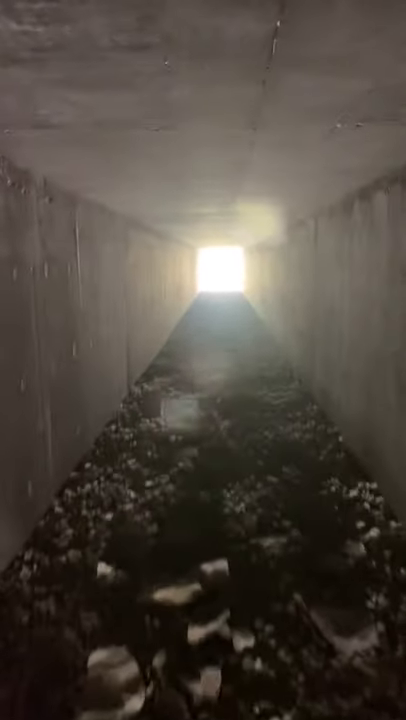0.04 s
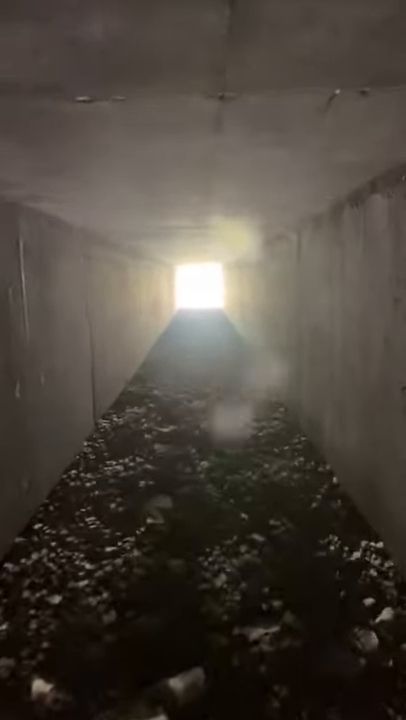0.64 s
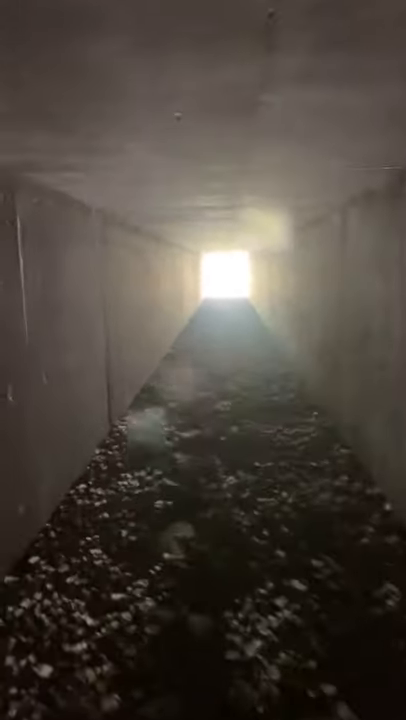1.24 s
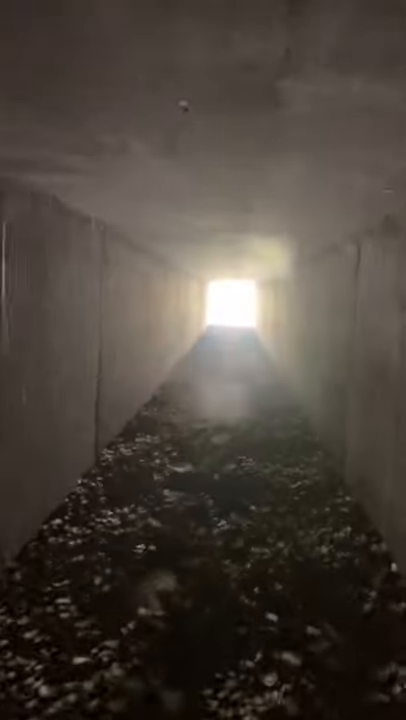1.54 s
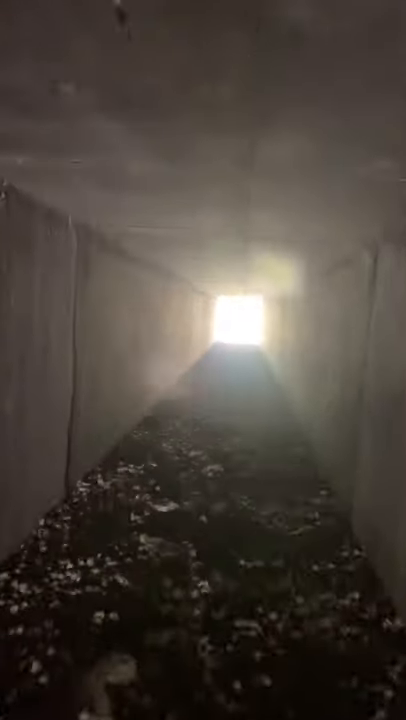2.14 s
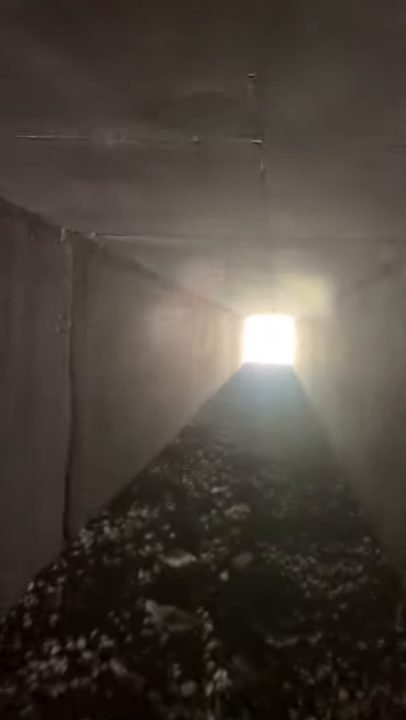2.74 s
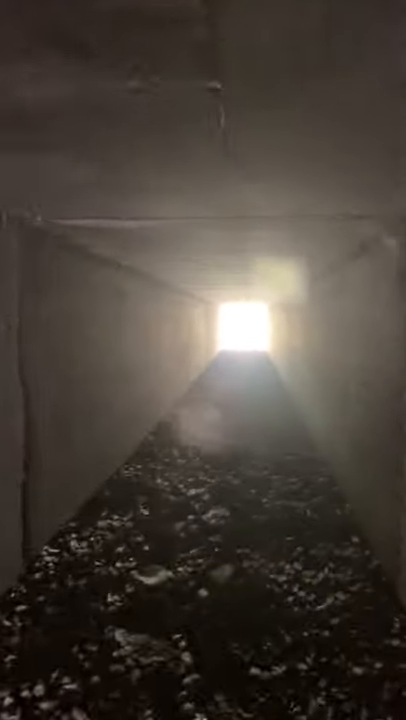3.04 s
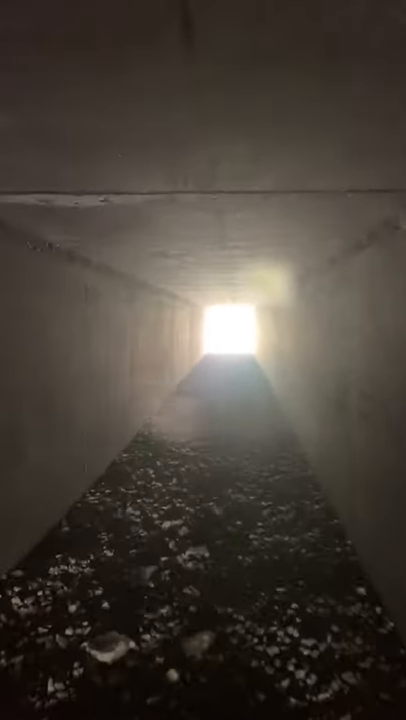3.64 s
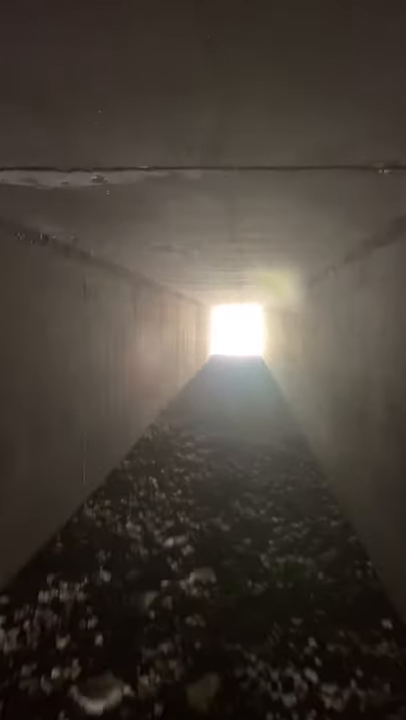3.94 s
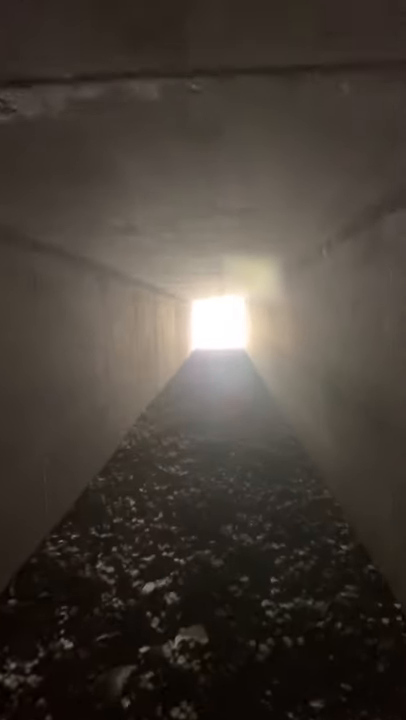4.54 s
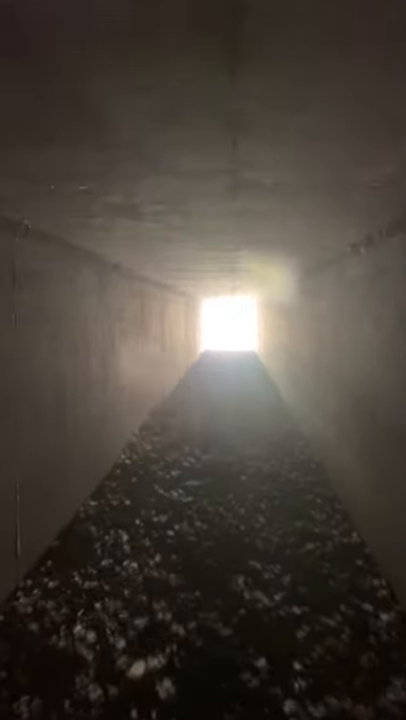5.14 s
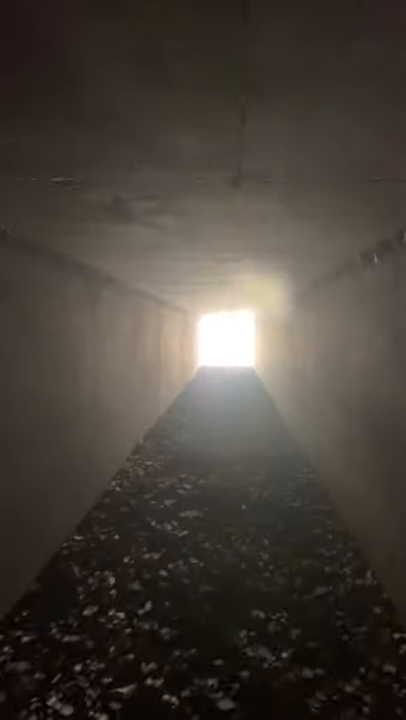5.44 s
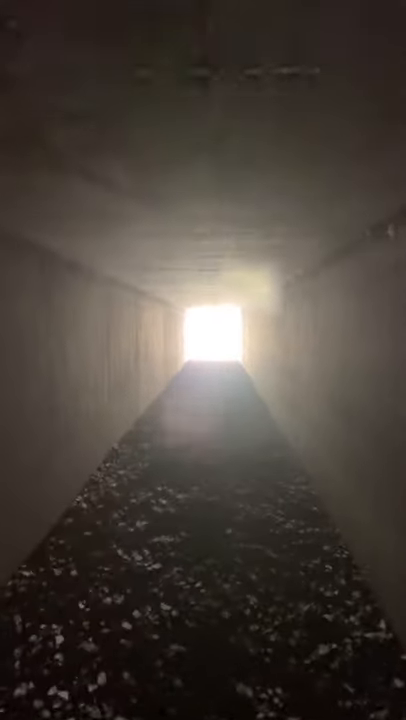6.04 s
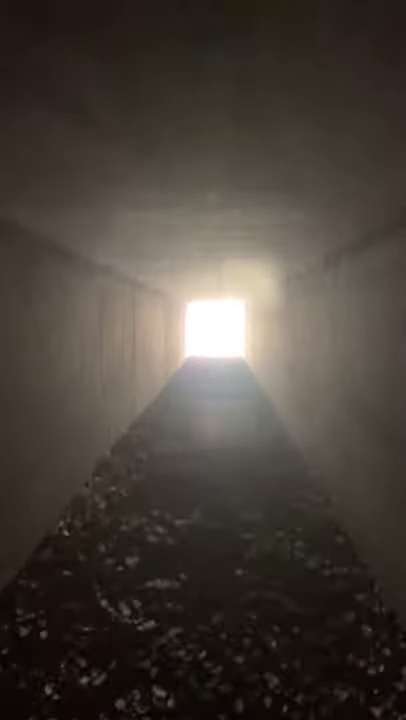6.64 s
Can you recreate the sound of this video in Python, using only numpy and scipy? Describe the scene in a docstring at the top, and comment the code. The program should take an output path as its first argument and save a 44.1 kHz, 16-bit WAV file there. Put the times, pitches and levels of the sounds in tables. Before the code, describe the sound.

Steady footsteps crunch through loose stones from start to finish, about three every two seconds, with scattered clacks and dull thuds as the gravel gives way. A narrow concrete tunnel makes them ring hollow and carries a deep rumble of faraway traffic that pulses with the walking. The sound is close, heard from a phone in the walker's hand, with light, low handling bumps.

```python
"""A narrow concrete tunnel, where someone walks on loose gravel holding a phone.
Heel and sole shove stones together, and each contact rings as a damped oscillator: together they crunch.
The walls return reverberation and hum with standing waves at their cross resonances.
Distant traffic rumbles down the tunnel, and each footfall swells its deep boom.
The moving hand bumps and knocks the phone, reaching the microphones as structure-borne sound."""
import sys
import numpy as np
from scipy import signal
from scipy.fft import rfft, irfft, next_fast_len
from scipy.io import wavfile
from scipy.ndimage import uniform_filter1d

SR = 44100
rng = np.random.default_rng(int(sys.argv[2]) if len(sys.argv) > 2 else 0)


def int16_out(signal):
    """Quantize to a 16-bit WAV file."""
    q = np.round(np.clip(np.atleast_2d(signal).T, -1, 1) * 32767)
    wavfile.write(sys.argv[1], SR, q.astype(np.int16))


N = 300321

# footfalls: heel lands t/s, heel settling time/s, heel level/dB, roll time/s, roll level/dB, boom level/dB
STEPS = [(0.094, .014, -36, 0.045, -47.5, -35), (0.653, 0.0053, -38, 0.2, -55.5, -27),
         (1.382, 0.038, -32.5, 0.15, -42, -30), (1.995, .014, -25, 0.093, -43, -26.5),
         (2.626, 0.028, -52, 0.073, -41.5, -28), (3.256, 0.0064, -36, 0.17, -45.5, -28.5),
         (3.956, .012, -34, 0.095, -50, -47), (4.556, .009, -42.5, 0.064, -36.5, -31),
         (5.187, 0.018, -31.5, 0.018, -38.5, -51), (5.785, .022, -36.5, 0.035, -43.5, -33),
         (6.426, .018, -32, 0.0098, -45.5, -31)]
# spectral colour of the stones at the phone: f/Hz, gain/dB
STONE_COLOUR = [(60, -37), (150, 2.5), (220, -1.5), (320, 1.5), (470, -1.5), (750, 1.5), (950, 0),
                (1400, -1.5), (2000, -5), (2600, 2), (3200, -3.5), (4200, -4), (5500, 0.9), (6400, -2.5),
                (7400, -12.5), (8400, -21.5), (12000, -21.5), (15000, -43)]


def gravel(bed_db=1, grit_db=-7.5):
    """Impact excitation: each contact of a shove knocks the packed bed, clacks a stone and cracks grit."""
    # stones giving way or kicked aside: t/s, settling time/s, level/dB, sharpness/dB
    slips = [(.002, 0.016, -46, 2.5), (.169, .008, -42, 8), (.194, 0.018, -43.5, 7),
             (0.274, 0.0054, -61, 14), (0.359, 0.017, -40, -1.5), (0.716, 0.0091, -36.5, -2.5),
             (0.748, 0.011, -42.5, 4), (0.941, .014, -52.5, -0.5), (1.114, .012, -29.5, 2),
             (1.136, 0.013, -29, -0.5), (1.158, .016, -27.5, 4), (1.196, 0.0059, -36.5, 0),
             (1.252, .026, -30, 1.5), (1.299, 0.0073, -48, 3), (1.413, 0.023, -43, -10),
             (1.525, 0.02, -47, 15.5), (1.594, .005, -30, -2.5), (1.714, 0.015, -33, -2.5),
             (2.003, .012, -28.5, 5), (2.125, .014, -38, 2), (2.25, 0.011, -44, 5),
             (2.291, 0.0085, -50.5, 4), (2.383, 0.021, -46.5, 1.5), (2.668, .022, -34.5, -3),
             (2.684, 0.011, -39.5, 9), (3.08, .016, -43, -3), (3.123, 0.016, -38.5, -4.5),
             (3.284, 0.012, -31.5, 2.5), (3.325, .022, -32, 3.5), (3.416, .007, -44, 12.5),
             (3.538, 0.019, -42.5, 6.5), (3.6, 0.027, -52, -6.5), (3.678, .016, -42.5, -1.5),
             (3.72, .018, -45, 2.5), (3.849, 0.044, -46, -4.5), (3.928, .012, -40, 0),
             (3.99, .016, -39, 0.5), (4.139, 0.017, -52.5, 7), (4.176, 0.014, -36, 1.5),
             (4.2, 0.0071, -35, -3.5), (4.397, 0.0054, -50.5, 4.5), (4.582, 0.018, -39.5, 2),
             (4.649, 0.007, -42, 2), (4.826, 0.0072, -52.5, 10.5), (4.853, 0.0047, -50, 4.5),
             (5.004, 0.014, -51.5, 6), (5.038, .025, -42, -0.5), (5.06, .022, -33.5, 0.5),
             (5.11, 0.04, -41.5, 1), (5.385, .012, -66, 10), (5.484, .014, -39.5, 1), (5.6, .04, -43, -3.5),
             (5.677, .01, -45, -2), (5.727, 0.028, -52, -1.5), (5.811, .012, -36.5, 0.5),
             (5.91, 0.03, -37.5, 6.5), (6.049, .02, -35.5, 5), (6.095, 0.0052, -41.5, 3.5),
             (6.135, 0.016, -47.5, 0), (6.2, 0.032, -44.5, -1), (6.265, 0.024, -43, 9.5),
             (6.35, 0.024, -44.5, 4.5), (6.398, 0.031, -38.5, -3.5), (6.452, 0.0082, -32, 5),
             (6.582, 0.031, -32.5, 3), (6.614, 0.026, -28.5, 4), (6.656, 0.01, -38, 4)]
    shoves = [shove for *step, _ in STEPS for shove in footfall(*step)] + slips
    track = np.zeros((2, N))
    for s, settle_s, db, sharp_db in shoves:
        delays, sizes = avalanche(settle_s)
        start = s + delays.min()
        smallness = np.exp(0.06 * rng.standard_normal())  # small stones sound higher
        bed = contacts(delays, sizes, pitch_hz=520 * smallness, scatter=0.45, cycles=1.73)
        stone = contacts(delays, sizes, pitch_hz=1330 * smallness, scatter=0.4, cycles=1.24)
        grit = contacts(delays, sizes, pitch_hz=4490, scatter=0.25, cycles=3.6)
        add(track, start, amp(db + bed_db - 0.85 * sharp_db) * bed)  # a sharp shove: less bed, more grit
        add(track, start, amp(db) * placed(stone))
        add(track, start, amp(db + grit_db + sharp_db) * placed(grit))
    return coloured(track, STONE_COLOUR)


def footfall(s, settle_s, heel_db, roll_s, roll_db, count=17, shifts_per_s=42):
    """Loading and unloading: the heel strikes, and small shifts of stones follow the load on the sole."""
    rise_db_per_s, release_db_per_s = 651.5, 150
    brush_s, shift_settle_s = 0.03, 0.015  # the shoe brushes the top stones before the heel lands
    heel_sharp_db = -1.5  # the heel drives deep into the bed
    age = (np.arange(count) + rng.random(count)) / shifts_per_s - brush_s
    load_db = roll_db - rise_db_per_s * np.maximum(-age, 0)
    load_db -= release_db_per_s * np.maximum(age - roll_s, 0)
    sharp_db = rng.normal(-0.5, 3, count)
    shifts = [(s + t, shift_settle_s, db, sharp) for t, db, sharp in zip(age, load_db, sharp_db)]
    return [(s, settle_s, heel_db, heel_sharp_db)] + shifts


def avalanche(settle_s, count=20, touch_count=6, spread_db=6.5, fade_db=2, touch_db=-15):
    """Granular relaxation: light touches, the hardest slip, then contacts at an exponentially falling rate."""
    age = -np.log(1 - (np.arange(count) + rng.random(count)) / (count + 1))  # in settling times
    sizes = amp(spread_db * np.clip(rng.standard_normal(count), -2, 1.6) - fade_db * age)
    sizes[1] = sizes.max()
    ahead = (np.arange(touch_count) + rng.random(touch_count)) / touch_count
    touches = sizes.max() * amp(touch_db * ahead)
    delays = settle_s * np.r_[-0.62 * ahead, age]
    return delays, np.r_[touches, sizes]


def contacts(delays, sizes, pitch_hz, scatter, cycles, size=360):
    """Superposition of damped sinusoids, one a contact, scaled to the energy of 10 ms at rms 1."""
    hz = pitch_hz * np.exp(scatter * rng.triangular(-2, 0, 2, (len(delays), 1)))
    turns = hz * np.arange(size) / SR
    push = sizes * rng.choice([-1, 1], len(sizes))
    onset = 1 - np.exp(-turns / 0.33)  # each contact swells in softly over about a third of a cycle
    grains = push[:, None] * np.sin(2 * np.pi * turns) * np.exp(-turns / cycles) * onset
    where = ((delays - delays.min()) * SR).astype(int)[:, None] + np.arange(size)
    cluster = np.bincount(where.ravel(), grains.ravel())
    return cluster * np.sqrt(SR / 100) / np.linalg.norm(cluster)


def clacks(count=4, longest_gap_s=0.0035, loss_db=6.5, graze_s=0.004, graze_db=-13.5):
    """Inelastic rebound: a large stone grazes its neighbour, then chatters, ringing in two modes."""
    # collisions of large stones: t/s, level/dB, f/Hz
    collisions = [(0.653, -45, 1860), (0.714, -42, 3300), (0.828, -45.5, 1510), (1.11, -33, 1680),
                  (1.133, -33.5, 3800), (1.16, -27, 1080), (1.163, -41, 4860), (1.194, -33, 3160),
                  (1.307, -39.5, 2440), (1.593, -27.5, 874), (1.594, -24, 1375), (1.598, -33, 1910),
                  (1.715, -42.5, 2000), (2.292, -44, 4200), (2.935, -56, 1870), (3.256, -41.5, 1560),
                  (3.284, -33, 4840), (3.329, -34, 2050), (3.412, -37.5, 5650), (3.678, -47, 2460),
                  (4.18, -49.5, 3950), (4.2, -41.5, 1500), (4.202, -41, 3400), (4.399, -56, 4600),
                  (4.555, -38, 1960), (4.652, -33, 1170), (5.058, -36, 2600), (5.186, -42, 3670),
                  (5.194, -38, 1250), (5.81, -47, 1800), (6.439, -37.5, 3670), (6.616, -28.5, 1370),
                  (6.618, -38.5, 4960), (6.628, -39.5, 2360), (6.665, -35, 1130), (6.74, -46, 5500)]
    track = np.zeros((2, N))
    for s, db, hz in collisions:
        bounces = np.cumsum(longest_gap_s * (1 + rng.random(count)) / 2)
        delays = np.r_[-graze_s, bounces - bounces[0]]
        sizes = amp(np.r_[graze_db, -loss_db * np.arange(count)])
        note = contacts(delays, sizes, pitch_hz=hz, scatter=0.097, cycles=1.8, size=800)
        overtone = contacts(delays, sizes, pitch_hz=hz * 1.604, scatter=0.15, cycles=1.6, size=800)
        add(track, s - graze_s, amp(db) * placed(note + amp(-8) * overtone))
    return coloured(track, STONE_COLOUR)


def thuds(settle_s=0.016, count=10):
    """Damped resonance: deep stones shift under the walker's weight and the bed gives a hollow note."""
    # shifts of the packed bed: t/s, level/dB, f/Hz
    deep_shifts = [(0.101, -35, 302.5), (1.147, -32, 342), (1.186, -42, 530), (1.395, -33.5, 450),
                   (1.996, -26, 445), (2.678, -29, 455), (2.7, -35, 264), (3.29, -32, 407),
                   (3.315, -42.5, 616), (3.953, -29.5, 562), (4.195, -31, 551), (4.568, -39, 410),
                   (5.069, -35, 517), (5.195, -35, 438), (5.801, -38.5, 430), (6.445, -31.5, 500),
                   (6.615, -33, 730), (6.664, -35.5, 534)]
    track = np.zeros((2, N))
    for s, db, hz in deep_shifts:
        age = 2 * (np.arange(count) + rng.random(count)) / count  # in settling times
        note = contacts(settle_s * age, np.exp(-age / 2), pitch_hz=hz, scatter=0.16, cycles=2.5, size=1600)
        add(track, s, amp(db) * placed(note))
    return coloured(track, STONE_COLOUR)


def snaps(length_s=0.015, count=30):
    """Brittle fracture: a breaking stone sheds a quick spray of tiny, bright chips."""
    # stones snapping underfoot: t/s, level/dB
    fractures = [(0.19, -63), (1.111, -55), (1.195, -64), (1.598, -63), (1.999, -43.5), (2.684, -65.5),
                 (3.28, -65.5), (3.415, -70), (3.537, -65.5), (4.18, -67), (4.59, -67), (5.191, -65),
                 (5.918, -59), (6.06, -67), (6.134, -64.5), (6.453, -55), (6.614, -51.5)]
    track = np.zeros(N)
    for s, db in fractures:
        delays = length_s * rng.random(count)
        sizes = rng.exponential(size=count)
        add(track, s, amp(db) * contacts(delays, sizes, pitch_hz=7500, scatter=0.18, cycles=1.4))
    return track


def reverberation(x, stretches=28):
    """Convolution with the tunnel's response, whose echo pattern changes as the walker moves on."""
    wet = np.zeros((2, N))
    for part in np.array_split(np.arange(N), stretches):
        add(wet, part[0] / SR, signal.fftconvolve(x[part][None], impulse_response(), axes=1))
    return diffuse(wet)


def impulse_response(early_db=-3, tail_db=-7.5, early_t60_s=0.097, first_wall_s=0.002):
    """Multiple reflection: a flurry from the near walls and a tail whose decay depends on frequency."""
    # reverberation time of the tunnel: f/Hz, T60/s
    decay_times = [(150, 0.97), (500, 0.58), (1100, 0.38), (1700, 0.55), (3100, 0.55), (4100, 0.87),
                   (5200, 0.53), (7000, 0.47), (10000, 0.37)]
    hz, frame_s, spectra = signal.stft(rng.standard_normal((2, SR)), SR, nperseg=256)
    decay = amp(-60 * frame_s / along(decay_times, hz)[:, None])
    tail = signal.istft(spectra * decay, SR, nperseg=256)[1][:, :SR]
    t = np.arange(SR) / SR
    early = rng.standard_normal((2, SR)) ** 3 * amp(-60 * t / early_t60_s)  # cubed noise is spiky
    response = (amp(early_db) * unit(early) + amp(tail_db) * unit(tail)) / np.sqrt(SR)
    return np.pad(response, ((0, 0), (round(first_wall_s * SR), 0)))


def standing_waves(x):
    """Normal modes: sound between parallel walls hums on at a few pitches, more in some places."""
    # cross resonances: f/Hz, relative level/dB, T60/s
    modes = [(165.3, -10, 0.12), (247.5, 0, 0.67), (332, -2.5, 0.23), (407, -8.5, 0.54),
             (506.3, -5.5, 0.18), (578, -6, 0.28), (654, -8.5, .45)]
    # coupling to the modes along the walk: t/s, gain/dB
    coupling = [(0, 4), (1.17, 8), (1.7, 0.5), (2.02, 6.5), (3.3, 6), (4.2, 8), (5.8, 4), (6.7, 4)]

    def response(f):
        total = 0
        for hz, db, t60 in modes:
            width_hz = np.log(1000) / (np.pi * t60)
            total = total + amp(db) * 1j * f * width_hz / (hz * hz - f * f + 1j * f * width_hz)
        return total
    return filtered(x * gain_curve(coupling), response)


def booms(delay_s=0.17, width_s=0.1):
    """Amplitude modulation: the deep resonance swells as the walker's weight arrives after each heel."""
    t = np.arange(N) / SR
    swells = sum(amp(db) * np.exp(-((t - s - delay_s) / width_s) ** 2 / 2) for s, *_, db in STEPS)
    return rumble() * swells


def bumps(gain_db=3.06, width_cycles=0.4, sag_s=0.046, tremble_s=0.24, count=2):
    """Structure-borne pulses: each jolt of the hand is a low push and pull, sagging as the grip gives."""
    # hard jolts on the phone: t/s, relative level/dB, f/Hz
    jolts = [(0.17, -28.5, 116), (0.259, -23.5, 82), (0.605, -25, 72), (0.892, -18, 92),
             (1.486, -19.5, 74.5), (1.56, -19.5, 89), (1.695, -25.5, 90.5), (2.097, -13.5, 79),
             (2.173, -32, 104), (2.212, -27.5, 120), (2.406, -34, 139), (2.599, -22, 147),
             (2.649, -21, 118), (2.74, -26, 93), (2.772, -29, 134), (2.851, -26, 88), (3.174, -32, 101),
             (3.423, -21.5, 75), (3.459, -33, 110), (3.957, -26, 100.5), (4.618, -24.5, 100),
             (4.732, -28, 72.5), (6.184, -30.5, 85), (6.678, -26.5, 124)]
    # light jolts after each footfall, same columns
    trembles = [(s + tremble_s * (k + rng.random()) / count,
                 rng.normal(-31.5, 1.5),
                 96 * np.exp(rng.normal(0, 0.17)))
                for s, *_ in STEPS for k in range(count)]
    track = np.zeros(N)
    t = np.arange(-SR // 30, SR // 30) / SR
    for s, db, hz in jolts + trembles:
        turns = hz * sag_s * (1 - np.exp(-t / sag_s))
        window = np.exp(-(hz * t / width_cycles) ** 2 / 2)
        add(track, s + t[0], -amp(db + gain_db) * np.sin(2 * np.pi * turns) * window)
    return track


def knocks(gain_db=-1, thud_hz=260, rub_log_width=0.42):
    """Impact and friction: a fingertip on the case makes a rough blip whose pitch drops into a thud."""
    # taps on the case: t/s, relative level/dB, starting f/Hz, rise time/s, roughness (0-1)
    taps = [(0.869, -36.5, 780, 0.0046, 0.3), (0.874, -27, 283, 0.0026, 0.23),
            (1.024, -42.5, 564, 0.0053, 0.23), (2.078, -31, 900, 0.0024, 0.16),
            (2.201, -38, 1410, 0.00077, 0.2), (2.585, -34.5, 2280, 0.0015, 0.13),
            (2.59, -32, 420, 0.0014, .1), (3.584, -44, 880, 0.0014, 0.16),
            (4.742, -37.5, 660, 0.0021, 0.06), (6.673, -34, 400, 0.0011, 0.56)]
    track = np.zeros(N)
    t = np.arange(SR // 20) / SR
    f = np.fft.rfftfreq(len(t), 1 / SR)
    for s, db, hz, rise_s, rough in taps:
        fall_s = 2 * rise_s
        turns = thud_hz * t + (hz - thud_hz) * fall_s * (1 - np.exp(-t / fall_s))
        band = 1 / (1 + (np.log((f + 1) / hz) / rub_log_width) ** 2) ** 2
        rub = unit(irfft(band * rfft(rng.standard_normal(len(t))), len(t)))
        blip = (1 - rough) * np.sin(2 * np.pi * turns) + rough * rub
        envelope = t / rise_s * np.exp(1 - t / rise_s)
        add(track, s, amp(db + gain_db) * blip * envelope)
    return track


def traffic(gain_db=0.74, wash_db=-57):
    """Duct propagation: a deep rumble and a faint steady wash come in through the tunnel mouths."""
    # rumble of a vehicle drawing nearer: t/s, relative level/dB
    approach = [(0, -39), (2.502, -36.5), (3.897, -37.5), (4.799, -35), (6.81, -37.5)]
    # spectrum of the wash: f/Hz, relative density/dB
    wash_spectrum = [(40, -18.5), (130, -18), (250, -6.5), (400, -8.5), (750, -5), (1100, -10), (1400, -12),
                     (1750, -19), (2300, -21), (2900, -30), (3600, -34.5), (4100, -22), (4500, -26.5),
                     (5400, -27), (7200, -47.5), (14000, -50)]
    return amp(gain_db) * gain_curve(approach) * rumble() + amp(wash_db) * diffuse_noise(wash_spectrum)


def rumble():
    """Resonance driven by noise: the tunnel's deep note, held at an even level."""
    # spectrum of the resonance: f/Hz, relative density/dB
    spectrum = [(20, -39.5), (32, -19.5), (42, -8.5), (54, 6), (66, -10), (90, -12.5), (130, -23.5),
                (200, -29.5), (400, -44), (900, -91)]
    noise = diffuse_noise(spectrum)
    power = uniform_filter1d(np.mean(noise ** 2, axis=0), size=SR // 8)
    return noise / np.sqrt(np.abs(power))


def diffuse_noise(spectrum):
    """Spectral shaping: white noise becomes a coloured diffuse field of rms 1."""
    noise = filtered(rng.standard_normal((2, N)), lambda hz: amp(along(spectrum, hz)))
    return unit(diffuse(noise))


def diffuse(pair):
    """Spatial coherence: two unrelated signals mix into a diffuse field at two close microphones."""
    # likeness of left and right: f/Hz, correlation (-1 to 1)
    coherence = [(100, 1), (220, 0.44), (320, 0.89), (900, 0.93), (1500, 0.89), (2200, -0.21), (4600, 0.41),
                 (5500, 0.24), (7000, 0.6)]

    def weights(hz):
        angle = np.arccos(np.clip(along(coherence, hz), -1, 1)) / 2
        return np.array([np.cos(angle), np.sin(angle)])
    common, apart = filtered(pair, weights)
    return np.array([common + apart, common - apart])


def placed(sound, spread_s=4e-5, spread_db=2):
    """Path difference: a stone to one side reaches the nearer microphone earlier and louder."""
    offset = np.clip(rng.standard_normal(), -2, 2)
    lag = round(spread_s * SR * offset)
    pair = np.array([np.pad(sound, (max(d, 0), max(-d, 0))) for d in (lag, -lag)])
    return pair * amp(spread_db * offset * np.array([[-1], [1]]) / 2)


def microphones(air):
    """Stereo widening: the phone shifts phase and level of airborne sound between its channels."""
    # left minus right: f/Hz, level/dB
    balance = [(100, -1.5), (180, 5), (280, 7.5), (500, 2), (850, 1.5), (1400, 2), (2200, 3), (2750, 0.5),
               (3150, -5), (3500, 3.5), (4150, 0.5), (4700, 1.5), (6500, 0)]
    # lead of the left channel: f/Hz, phase/rad
    lead = [(170, 0), (230, 1.9), (290, 3), (600, 3), (1300, 3.5), (1750, 5), (2000, 6.5), (2300, 8),
            (2800, 10), (3500, 11), (4500, 13.6), (6200, 14), (7000, 16.5)]
    side = np.array([[1], [-1]]) / 2
    return filtered(air, lambda hz: amp(side * along(balance, hz)) * np.exp(1j * side * along(lead, hz)))


def coloured(x, points, size=2048):
    """Minimum-phase filtering: folding the cepstrum makes the (f/Hz, gain/dB) shape causal."""
    gain = amp(along(points, np.fft.rfftfreq(size, 1 / SR)))
    cepstrum = irfft(np.log(gain))
    cepstrum[1:size // 2] *= 2
    cepstrum[size // 2 + 1:] = 0
    kernel = irfft(np.exp(rfft(cepstrum)))
    return signal.fftconvolve(np.atleast_2d(x), kernel[None], axes=1)[:, :N]


def filtered(x, response):
    """Linear filtering: the spectrum of x times a complex response of frequency."""
    size = next_fast_len(N + SR // 2)
    return irfft(rfft(x, size) * response(np.fft.rfftfreq(size, 1 / SR)), size)[..., :N]


def add(track, s, sound):
    """Superposition: mix a sound into a track from time s."""
    start = max(0, round(s * SR))
    part = track[..., start:start + sound.shape[-1]]
    part += sound[..., :part.shape[-1]]


def along(points, hz):
    """Interpolation of (f/Hz, value) points on a logarithmic frequency axis."""
    f, values = np.transpose(points)
    return np.interp(np.log(hz + 1), np.log(f), values)


def gain_curve(points):
    """Interpolation of (t/s, level/dB) points into a gain for every sample."""
    s, db = np.transpose(points)
    return amp(np.interp(np.arange(N) / SR, s, db))


def amp(db):
    """Decibels to amplitude ratio."""
    return 10 ** (np.asarray(db) / 20)


def unit(x):
    """Normalisation to rms 1."""
    return x / np.sqrt(np.mean(x ** 2) + 1e-20)


def scene(clack_echo_db=-4):
    """Two paths: steps and traffic are airborne; handling reaches both channels alike through the case."""
    crunch = gravel() + thuds() + snaps()
    stones = clacks()  # large stones lie on top and are heard more directly
    echoes = reverberation((crunch + amp(clack_echo_db) * stones)[0])
    air = crunch + stones + echoes + booms() + traffic()
    return microphones(air + standing_waves(air)) + bumps() + knocks()


def record(dry, top_hz=12400):
    """Band limiting: the phone keeps nothing above its top frequency."""
    return filtered(dry, lambda hz: hz < top_hz)


dry = scene()
out = record(dry)
int16_out(out)
```